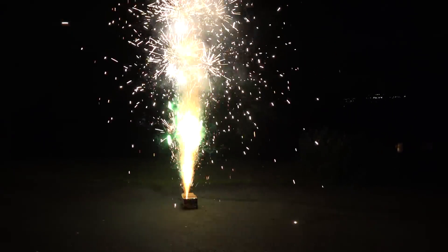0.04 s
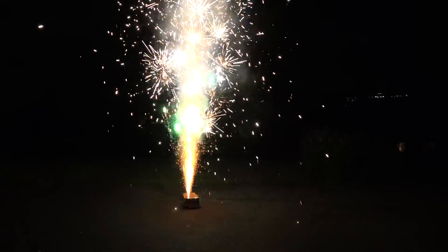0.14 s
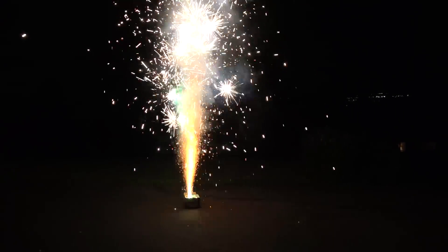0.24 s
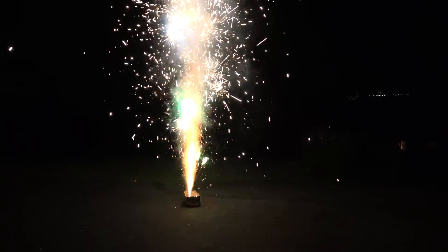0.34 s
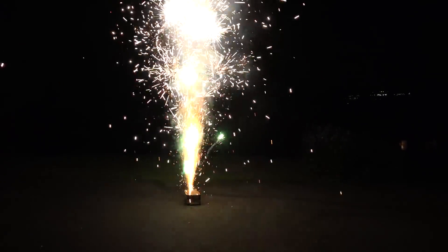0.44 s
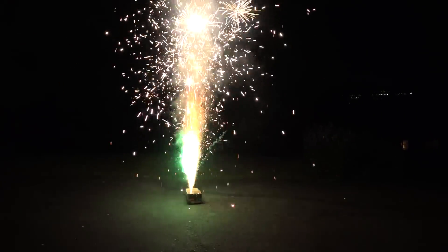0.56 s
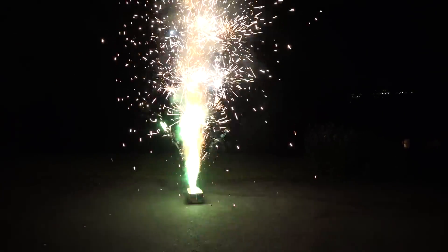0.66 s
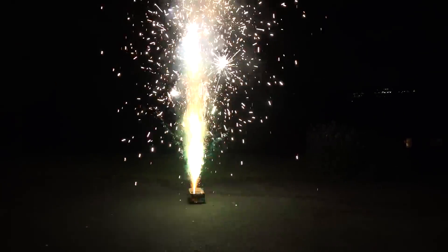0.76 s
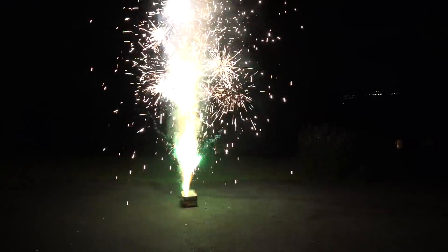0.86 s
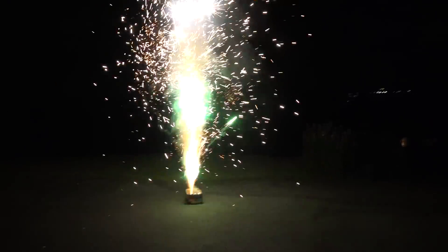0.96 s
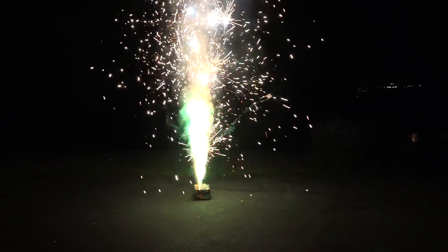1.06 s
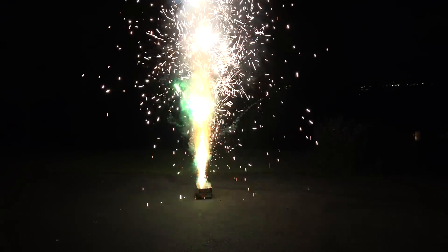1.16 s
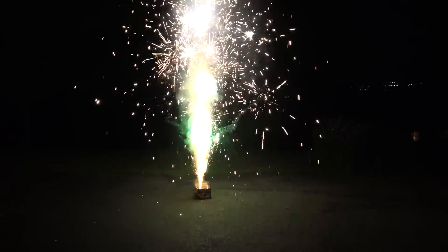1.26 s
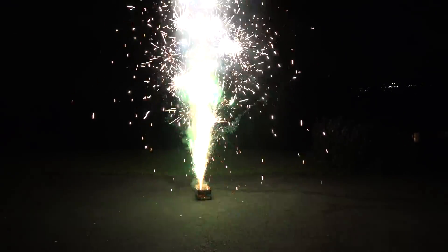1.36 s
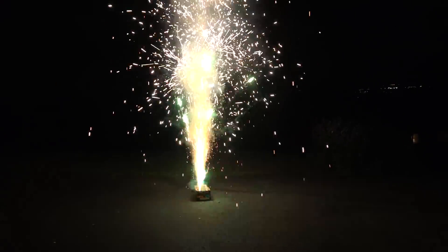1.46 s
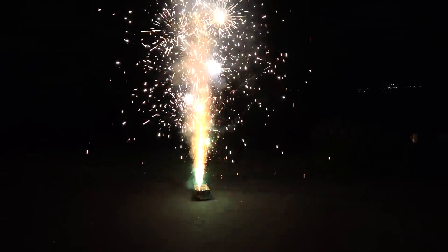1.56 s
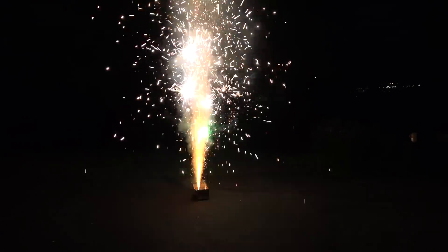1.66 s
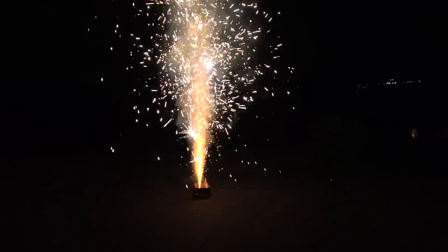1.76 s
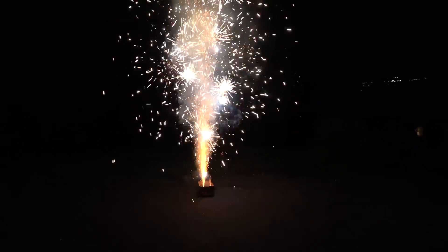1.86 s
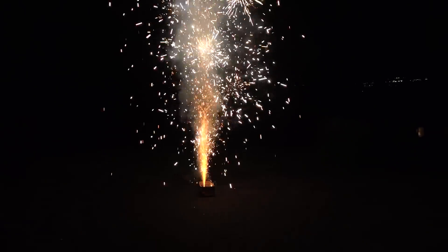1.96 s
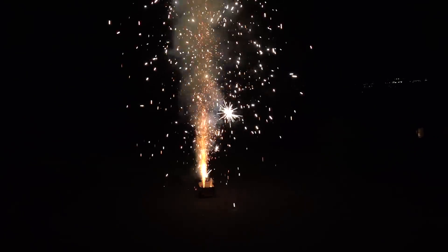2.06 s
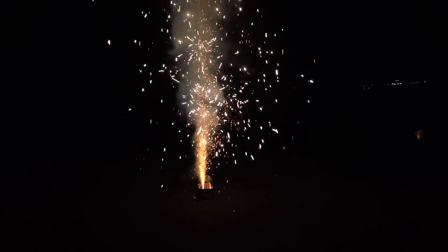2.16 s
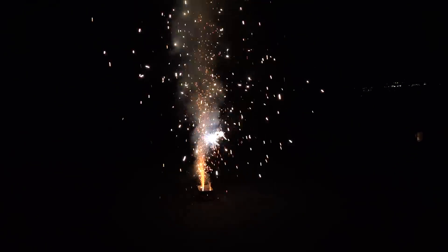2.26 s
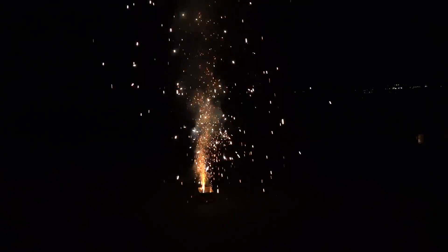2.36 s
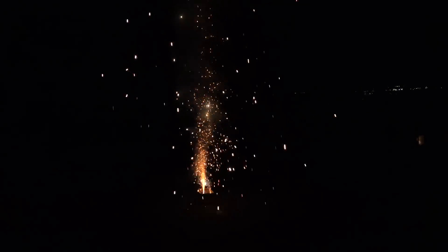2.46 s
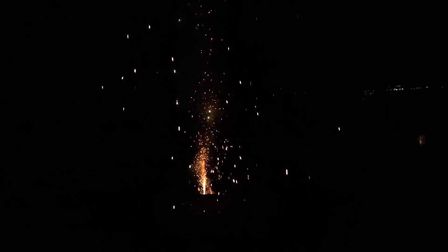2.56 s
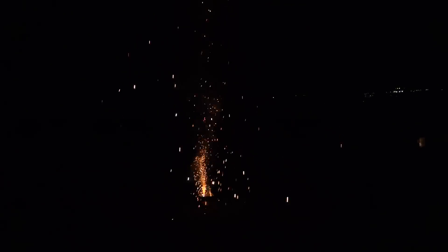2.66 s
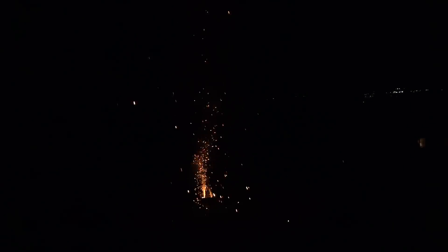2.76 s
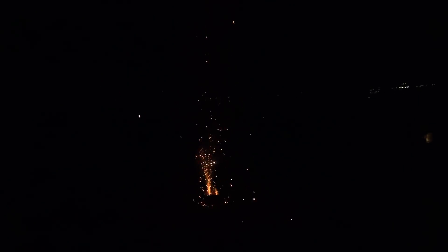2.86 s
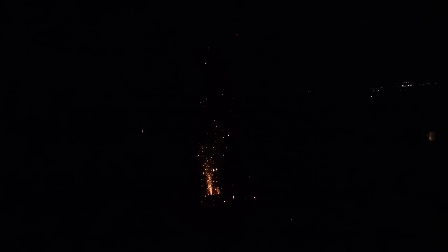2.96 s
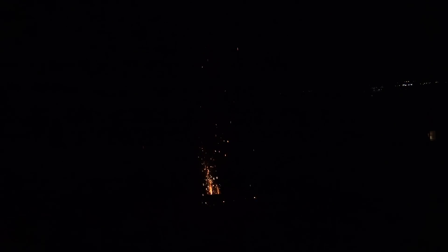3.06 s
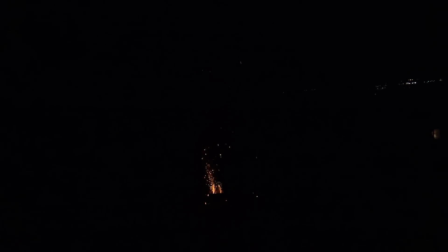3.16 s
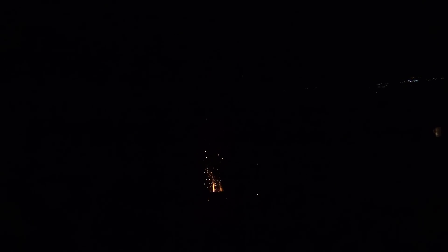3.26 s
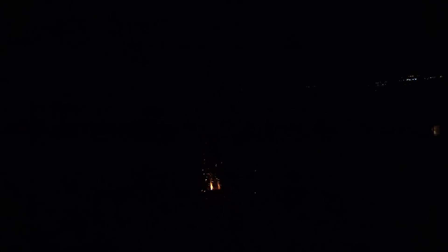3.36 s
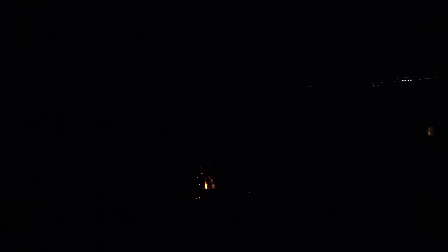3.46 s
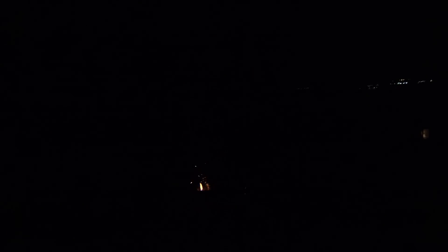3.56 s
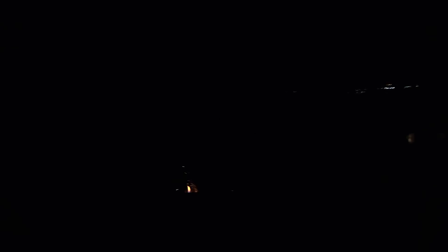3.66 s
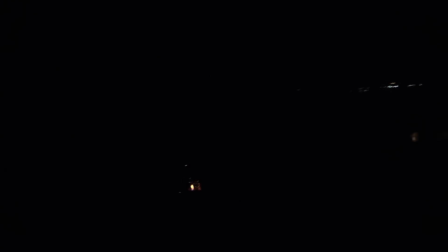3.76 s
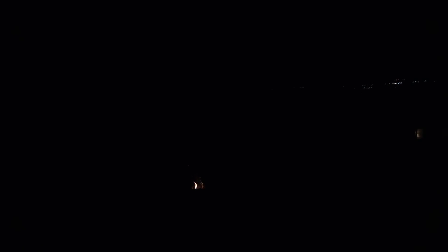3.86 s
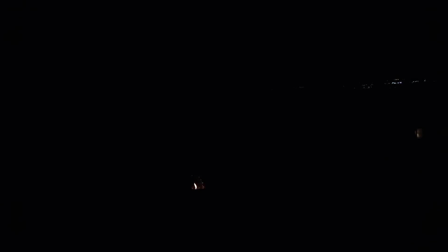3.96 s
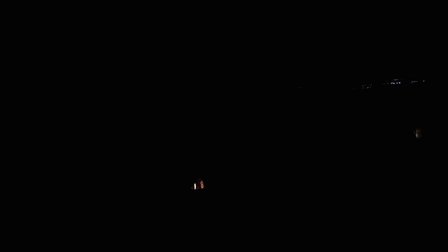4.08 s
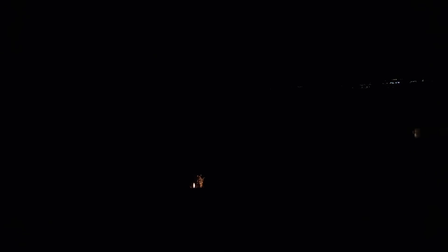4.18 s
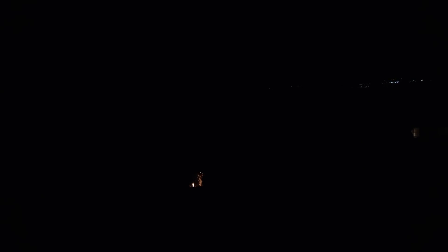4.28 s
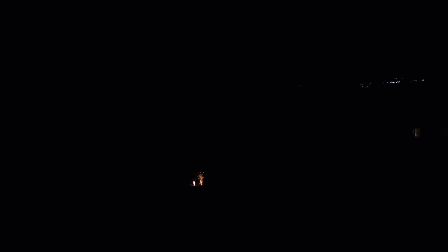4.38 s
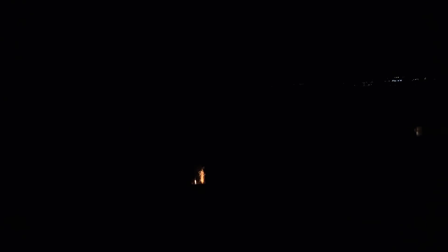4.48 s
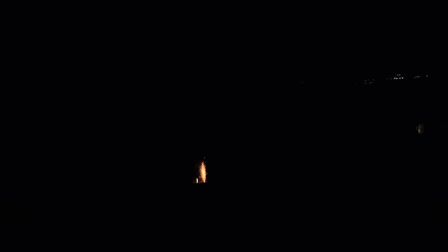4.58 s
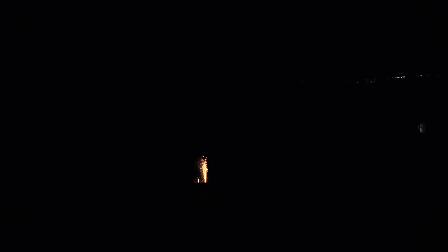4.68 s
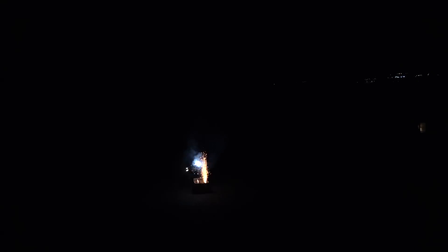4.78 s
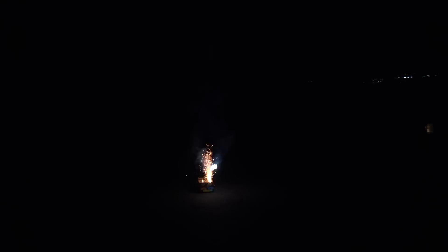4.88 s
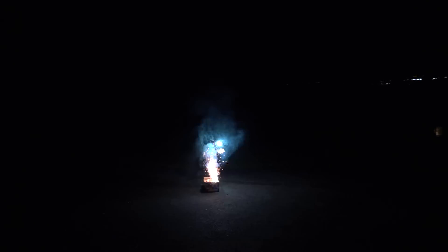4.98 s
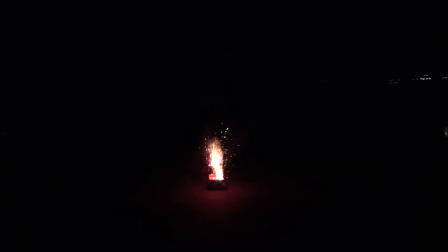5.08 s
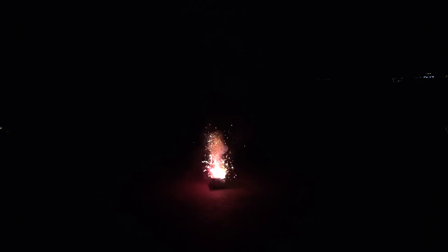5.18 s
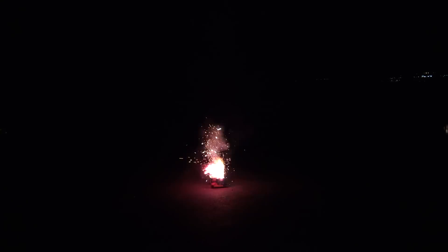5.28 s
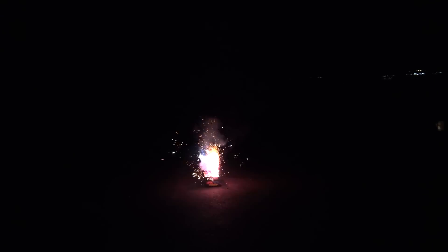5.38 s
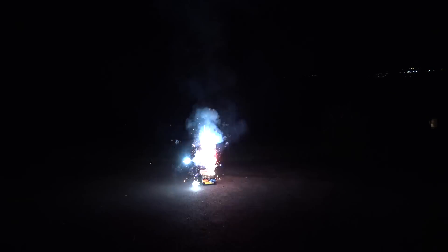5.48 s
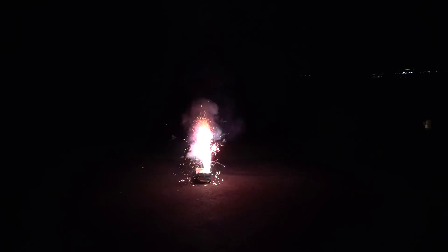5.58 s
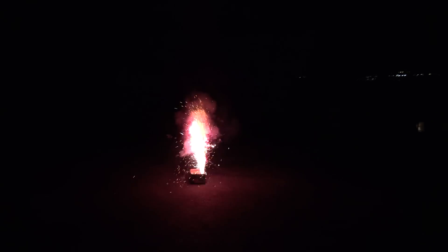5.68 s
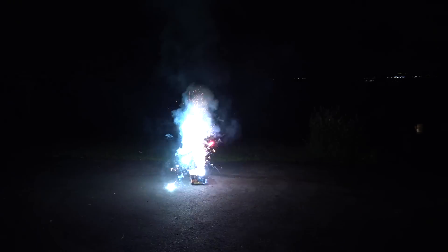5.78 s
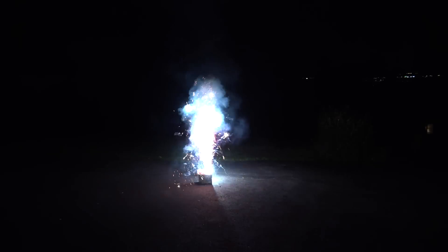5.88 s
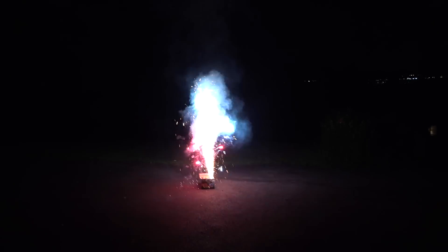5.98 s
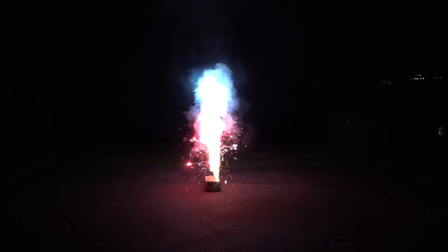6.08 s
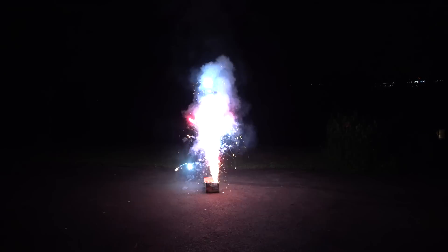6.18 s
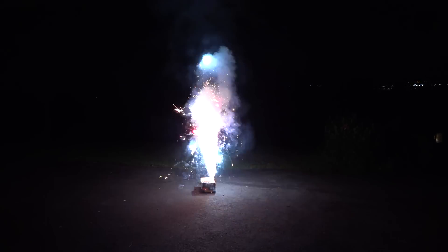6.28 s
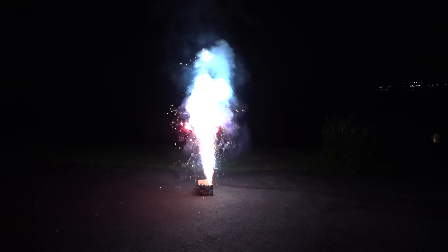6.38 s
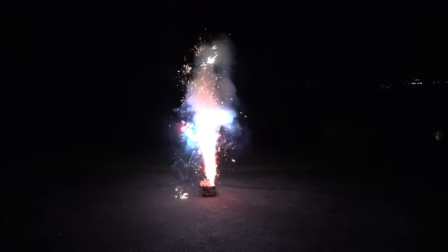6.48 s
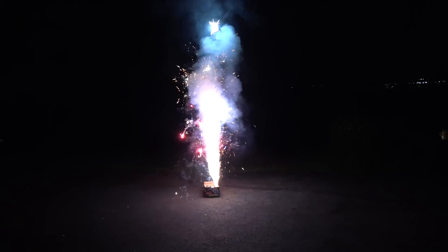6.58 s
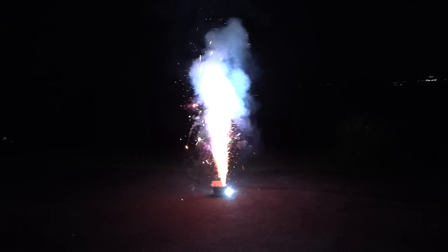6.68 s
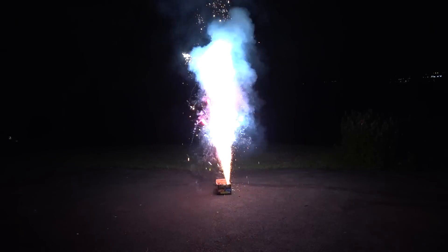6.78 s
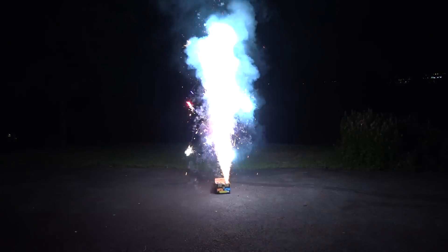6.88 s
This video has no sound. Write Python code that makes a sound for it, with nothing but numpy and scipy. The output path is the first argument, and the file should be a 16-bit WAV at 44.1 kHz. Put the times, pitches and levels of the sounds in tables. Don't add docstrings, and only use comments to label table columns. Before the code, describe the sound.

Dense, loud firework crackle snaps for two seconds, drops to a faint gassy hiss, then a new fountain sputters up into a rough roar.

```python
import sys
import numpy as np
from scipy import signal
from scipy.fft import rfft, irfft
from scipy.io import wavfile
from scipy.ndimage import uniform_filter1d

SR = 44100
rng = np.random.default_rng(int(sys.argv[2]) if len(sys.argv) > 2 else 0)


def digitize_waveform(pressure):
    field = np.atleast_2d(pressure).T
    bounded = np.clip(field, -1, 1)
    quanta = np.round(bounded * 32767).astype(np.int16)
    wavfile.write(sys.argv[1], SR, quanta)


def ratio_of_db(decibels):
    return 10 ** (np.asarray(decibels, float) / 20)


N = 306045

# pitch_hz, level_db
STAR_COLOUR = [(88, -43.5), (150, -15.5), (254, -6.5), (454, -10.5), (630, -6), (2010, -5), (2290, -4),
               (2840, -5.5), (5460, 0), (7040, -7), (8140, -0.5), (10700, -16), (11500, -10),
               (15000, -73.5), (22000, -120)]
# time_s, depth_db, half_width_s
LULLS = [
    (0.116, 2.5, 0.12),
    (0.48, 3.5, 0.031),
    (0.634, 4.5, 0.027),
    (0.852, 13, 0.0063),
    (0.952, 3.5, 0.024),
    (1.01, -3.5, 0.0043),
    (1.142, 3, 0.036),
    (1.655, 5, .015),
    (1.714, -1, .012),
]
# start_s, jolt_db
NEAR_SHOCKS = [(0.1815, -24), (0.2195, -21), (0.2765, -17), (0.3447, -36), (0.3784, -27), (0.4572, -36),
               (0.7039, -19), (0.7149, -19), (0.8349, -17), (0.9427, -22), (0.9844, -36), (1.1327, -15),
               (1.1537, -17), (1.1673, -31), (1.2037, -21), (1.3087, -31), (1.4464, -24), (1.4614, -18),
               (1.5028, -25), (1.5348, -24), (1.6386, -23), (1.688, -32), (1.7639, -18), (1.8137, -36)]
# start_s, peak_db,
# shocks, spacing_ms
LAST_STARS = [(1.8835, -12, 4, 1.3), (1.9032, -18, 2, .7), (1.9693, -18, 3, 1.0), (1.975, -11, 2, 2.0),
              (1.9941, -12, 2, 2.8), (2.0014, -11, 4, 2.5), (2.0261, -10, 4, 1.2), (2.0346, -11, 2, 3.2),
              (2.0751, -22, 1, 1.0), (2.1676, -24, 2, 1.6), (2.1743, -16, 6, 1.1), (6.32, -13, 2, 2.1),
              (6.448, -8, 2, 2.6), (6.4562, -13, 2, 1.5), (6.4871, -9, 2, 3.9), (6.7113, -9.5, 1, 1.0),
              (6.7563, -11, 1, 1.0), (6.8558, -10.5, 1, 1.0)]
# pitch_hz, level_db
RUMBLE_COLOUR = [(18, -34), (30, -30), (54, -16), (113, -4), (214, -6), (253, -18.5), (368, -21.5),
                 (420, -46), (550, -71.5), (920, -120)]
# pitch_hz, level_db
ROAR_COLOUR = [(120, -18), (200, 2.5), (283, 1.5), (454, -3), (755, -2.5), (1190, -7), (1900, -11.5),
               (2470, -43), (4180, -120)]
# pitch_hz, level_db
HISS_COLOUR = [(900, -35.5), (1700, -12.5), (2400, 0.5), (3300, -2.5), (5000, -6.5), (6700, -13.5),
               (7600, -16), (9000, -15), (9700, -28), (11500, -24)]
# pitch_hz, level_db
FAINT_HISS_COLOUR = [(900, -41.5), (1700, -26), (2000, -16.5), (2500, -7), (4000, -7.5), (5200, -11),
                     (6700, -21.5), (7600, -20), (8600, -23.5), (9000, -24.5), (9600, -28.5),
                     (11500, -26.5)]
# pitch_hz, width_hz, lift_db
TUBE_RINGING = [(113, 17, 3.6), (164, 19, 3.7)]
# pitch_hz, width_hz, lift_db
MOUTH_RINGING = [(3646, 520, 4.5), (4580, 470, 3), (7870, 570, 7.5), (8230, 130, 3)]
# pitch_hz, width_hz, lift_db
WEAK_FLAME_RINGING = [(3560, 260, 3.0), (4640, 200, 3.5)]
# time_s, burn_db
BURN = [(2.3, -57.5), (2.55, -59), (3.05, -56), (3.4, -58), (3.8, -56), (4.1, -58), (4.4, -57), (4.62, -50),
        (4.9, -43.5), (5.08, -47.5), (5.34, -40.5), (5.52, -37), (5.62, -40.5), (5.7, -35.5), (5.93, -34.5),
        (6.03, -34), (6.45, -31), (6.94, -26)]
# pitch_hz, level_db
ECHO_COLOUR = [(200, -11), (1500, -9.5), (3000, -14), (5000, -4), (8000, -8), (11000, -10.5)]
# pitch_hz, fade_s
ECHO_FADE = [(200, 0.23), (1000, 1), (4500, 1), (10000, 1)]
# start_s, tick_db, knock_db, puff_db
SPITS = [(2.3844, -28, -23, -5), (2.392, -37, -25, 0), (2.4897, -39, -11, -6), (2.796, -33, -14, -11),
         (4.6329, -31, -0.5, -13), (4.6782, -25.5, -25, -14), (4.6954, -27.5, -5, -2),
         (4.7943, -21.5, -5.5, -7), (4.8988, -21.5, -3, 0), (4.9215, -18, -20, -24),
         (4.9663, -22, -1.5, -2.5), (5.0645, -19.5, -4, -7.5), (5.1526, -20, -8, -0.5),
         (5.2326, -24, -0.5, -3), (5.2841, -19, -13, -9), (5.3778, -25, 3, 4.5), (5.393, -25, -2, 4),
         (5.4745, -28, 4, 7.5), (5.5062, -17, -13, -3), (5.5728, -26.5, 2, 4), (5.6864, -22, -6, 4.5),
         (5.92, -16.5, 4, 5), (5.9475, -15.5, -0.5, 2.5), (6.106, -14.5, -5.5, -14),
         (6.2485, -15.5, -16, -1), (6.321, -15.5, -1, 1), (6.448, -20, -6, -3), (6.124, -16, 1, 1),
         (6.3512, -23, 7, 1), (5.7118, -24, 3, 5.5)]
# pitch_hz, level_db
TICK_COLOUR = [(2000, -38), (3200, -5.5), (4600, -1.5), (6500, -11), (8000, -12), (11000, -25)]
# pitch_hz, level_db
KNOCK_COLOUR = [(600, -27), (1200, -1), (2200, -2), (3200, -8.5), (5500, -27.5)]
# pitch_hz, level_db
PUFF_COLOUR = [(80, -36), (250, 0.5), (500, -6), (780, -0.5), (1100, -4.5), (1700, -14.5), (4000, -49.5)]
# pitch_hz, width_hz, lift_db
HOLLOW_RINGING = [(760, 280, 3)]
# pitch_hz, level_db
PORT_DIFFERENCE = [(60, -16.5), (220, -18), (820, -10), (1600, -28.5), (3000, -20.5), (4600, -18.5),
                   (5900, -5), (7000, -0.5), (11300, 3.5)]
# pitch_hz, level_db
LEFT_TREBLE = [(3000, -54), (5800, -68.5), (7000, -24), (8100, -12), (11000, -17.5)]
# pitch_hz, level_db
SELF_NOISE_COLOUR = [(60, 9), (700, -7), (2000, -15.5), (5000, -21.5), (8000, -15.5), (11000, -20)]

SHOWER_END_S, SHOWER_FADE_DB_PER_S = 1.885, 1.5
CRACKS_PER_S, CRACK_DB, CRACK_SPREAD_DB = 140., -11.3, 1.5
BOUNCE_MS, BOUNCE_DB, BOUNCE_JOLT_DB = 3.6, -4.0, -31
BOUNCE_SPREAD_MS = 1.6
STRING_FADE_DB = 1.3
DULL_HZ, DEBRIS_DB, DEBRIS_MS = 3550, -23, 0.91

OLD_DB, OLD_SAG_DB_PER_S = np.array([[-53], [-45], [-33.5]]), np.array([[1.5], [6], [3.6]])
OLD_OUT_S, OLD_DIES_DB_PER_S = 2.056, 81.5
# level at a burn of -45 dB, and dB gained for each dB of burn
NEW_DB, NEW_SLOPE = np.array([[-43], [-47], [-44.5]]), np.array([[0.36], [1.055], [0.97]])
WARM_DB, WARM_S = 9.5, .5
FLARE_S, SPUTTER_PER_S, SPUTTER_DB = 4.6, 85, 8


def evened(x):
    return x / np.sqrt(np.mean(x ** 2) + 1e-20)


def read(points, hz):
    f, value = np.transpose(points)
    return np.interp(np.log(hz + 1), np.log(f + 1), value)


def causal(points, modes=()):
    hz = abs(np.fft.fftfreq(8192, 1 / SR))
    db = read(points, hz)
    for f, width, lift_db in modes:
        db = db + lift_db / (1 + (2 * (hz - f) / width) ** 2)
    gain = np.log(ratio_of_db(np.maximum(db, -100)))
    spectrum = np.exp(gain - 1j * signal.hilbert(gain).imag)
    return np.fft.ifft(spectrum).real[:3000]


def coloured(x, points, modes=()):
    return signal.oaconvolve(x, causal(points, modes))[:N]


def shock(points, modes=()):
    pulse = causal(points, modes)
    return -pulse / pulse.max()


def train(times, sizes):
    out = np.zeros(N)
    places = np.round(np.asarray(times) * SR).astype(int) - 2
    np.add.at(out, np.clip(places, 0, N - 1), sizes)
    return out


def around(x, rise_ms, fall_ms):
    rise, fall = np.exp(-1e3 / (rise_ms * SR)), np.exp(-1e3 / (fall_ms * SR))
    after = signal.lfilter([1], [1, -fall], x)
    before = signal.lfilter([0, rise], [1, -rise], x[::-1])[::-1]
    return after + before


def ground(x, ms, db):
    return x + ratio_of_db(db) * np.roll(x, round(ms * SR / 1e3))


def clumps(per_s, ms, dense, spread_db):
    starts = (rng.random(N) < per_s / SR) * rng.exponential(1, N)
    swarm = signal.lfilter([1], [1, -np.exp(-1e3 / (ms * SR))], starts)
    fires = rng.random(N) < dense * (swarm + .4) / SR
    return fires * ratio_of_db(spread_db * np.minimum(rng.exponential(1, N), 2.6))


def cracks(busy):
    step, chance, height, size = rng.random((round(CRACKS_PER_S * SHOWER_END_S), 4)).T
    s = np.cumsum(.3 + 1.4 * step) / CRACKS_PER_S
    happens = chance < busy[(s * SR).astype(int)] ** 2
    peak = ratio_of_db(CRACK_SPREAD_DB * 3.4 * (size - .5)) * happens
    late_s = (BOUNCE_MS + BOUNCE_SPREAD_MS * (height - .7)) / 1e3
    return train(s, peak) + train(s + late_s, peak * ratio_of_db(BOUNCE_DB * 2 * height))


def stars():
    t = np.arange(N) / SR
    lull_db = sum(db * np.exp(-((t - s) / width) ** 2) for s, db, width in LULLS)
    fade_db = SHOWER_FADE_DB_PER_S * np.maximum(t - SHOWER_END_S + 1, 0)
    busy = ratio_of_db(-lull_db - fade_db) * (t < SHOWER_END_S)

    small = ground(clumps(110., ms=9., dense=1100., spread_db=4.5), ms=2.8, db=-16.0)
    power = uniform_filter1d(small ** 2, size=2600) * np.sum(shock(STAR_COLOUR) ** 2)
    small *= ratio_of_db(-33.0) * busy / np.sqrt(power + 1e-9)

    near = ground(train(np.transpose(NEAR_SHOCKS)[0], 1.), BOUNCE_MS, BOUNCE_DB)
    big = ratio_of_db(CRACK_DB) * (cracks(busy) + ratio_of_db(-0.5) * near)
    for s, db, count, ms in LAST_STARS:
        k = np.arange(count)
        late, weak = rng.random((8, 2))[:count].T
        follows = k > 0
        times = s + (k + .5 * (late - .5) * follows) * ms / 1e3
        big += train(times, ratio_of_db(db - (STRING_FADE_DB * k + 1.2 * weak) * follows))

    debris = ratio_of_db(DEBRIS_DB) * rng.standard_normal(N) * around(big, DEBRIS_MS, DEBRIS_MS)
    shocks = small + big
    dull = 0.18 * rng.random(N)
    keep = np.exp(-2 * np.pi * DULL_HZ / SR)
    dulled = signal.lfilter([1 - keep], [1, -keep], dull * shocks)
    shocks = (1 - dull) * shocks + 3.55 * dulled + debris
    aside = shocks * rng.standard_normal(N)
    return [signal.oaconvolve(x, shock(STAR_COLOUR))[:N] for x in (shocks, aside)]


def registers():
    t = np.arange(N) / SR
    since_out_s = np.maximum(t - OLD_OUT_S, 0)
    old = OLD_DB - OLD_SAG_DB_PER_S * t - OLD_DIES_DB_PER_S * since_out_s
    new = NEW_DB + NEW_SLOPE * (np.interp(t, *np.transpose(BURN)) + 45)
    new[0] -= WARM_DB * np.exp(-since_out_s / WARM_S)
    return 10 * np.log10(ratio_of_db(2 * old) + ratio_of_db(2 * new))


def flicker(hz):
    size = int(SR / hz)
    return evened(uniform_filter1d(uniform_filter1d(rng.standard_normal(N), size), size))


def patchy(x, db):
    z = signal.stft(x, nperseg=512)[2]
    patches = uniform_filter1d(rng.standard_normal(z.shape), size=6, axis=0)
    patches = uniform_filter1d(patches, size=24, axis=1)
    return signal.istft(z * ratio_of_db(db * evened(patches)), nperseg=512)[1][:N]


def jet():
    rumble_db, roar_db, hiss_db = registers()
    gust, flutter = flicker(15.), flicker(100.)
    grains = evened(ground(clumps(40., ms=6., dense=2000.0, spread_db=-0.5), ms=.9, db=-8.0))
    strong = np.clip((roar_db + 62) / 18, 0, 1)
    noise = rng.standard_normal((3, N))

    rumble = evened(coloured(noise[0], RUMBLE_COLOUR, TUBE_RINGING))
    rumble *= ratio_of_db(rumble_db + 0.5 * gust + 0.34 * flutter)

    roar = evened(coloured(noise[1] - 0.26 * strong * grains, ROAR_COLOUR))
    roar *= ratio_of_db(roar_db + strong * (0.1 * gust + 2.1 * flutter))

    gas = noise[2] - 0.27 * strong * grains
    full = evened(coloured(gas, HISS_COLOUR, MOUTH_RINGING))
    faint = evened(coloured(gas, FAINT_HISS_COLOUR, MOUTH_RINGING + WEAK_FLAME_RINGING))
    hiss = strong * full + (1 - strong) * patchy(faint, db=1.6)
    hiss *= ratio_of_db(hiss_db - 0.5 + strong * (.6 * gust + 1.0 * flutter))
    return rumble, roar + hiss


def yard(x, wall_ms=50.7, wall_db=11.5):
    taps = np.zeros((2, SR // 2))
    at = np.arange(300, SR // 2 - 20, 20)
    at = at + rng.integers(0, 20, (2, len(at)))
    wall = 1 + ratio_of_db(wall_db) * np.exp(-((at / SR * 1e3 - wall_ms) / 18.0) ** 2)
    np.put_along_axis(taps, at, wall * rng.choice([-1., 1.], at.shape), 1)
    hz, t, z = signal.stft(taps, SR, nperseg=256)
    fade_db = np.log10(1e60) * t / read(ECHO_FADE, hz)[:, None]
    fading = ratio_of_db(read(ECHO_COLOUR, hz)[:, None] - fade_db)
    tail = signal.istft(z * fading, SR, nperseg=256)[1]
    return signal.fftconvolve(x[None], tail / np.linalg.norm(tail[0]), axes=1)[:, :N]


def jolts():
    s, db = np.transpose(NEAR_SHOCKS)
    u = np.arange(SR // 50) / SR / 0.00068
    step = (1 - np.exp(-u / 0.11)) * (1.52 * np.exp(-u) - 0.37 * np.exp(-u / 12.0))
    pushes = train(s, ratio_of_db(db)), train(s + BOUNCE_MS / 1e3, ratio_of_db(BOUNCE_JOLT_DB - 6))
    hit = np.array([signal.oaconvolve(x, step)[:N] for x in pushes])
    low_cut = signal.butter(2, 42, btype="high", fs=SR)
    return signal.lfilter(*low_cut, hit - 0.46 * hit[::-1])


def sputter():
    left_s = N / SR - FLARE_S
    s, size, knock, puff = rng.random((round(SPUTTER_PER_S * left_s), 4)).T
    s = FLARE_S + s * left_s
    tick_db = np.interp(s, *np.transpose(BURN)) + SPUTTER_DB + 6.0 * (size - .5)
    return np.c_[s, tick_db, -4.0 + 14. * (knock - .5), -4.5 + 12. * (puff - .5)]


def spits():
    s, db, knock_db, puff_db = np.r_[SPITS, sputter()].T
    ticks = signal.oaconvolve(train(s, ratio_of_db(db - 5.0)), shock(TICK_COLOUR, MOUTH_RINGING))
    knocks = signal.oaconvolve(train(s, ratio_of_db(db + knock_db + 1.2)), shock(KNOCK_COLOUR))
    puffs = signal.oaconvolve(train(s, ratio_of_db(db + puff_db - 1.5)), shock(PUFF_COLOUR, HOLLOW_RINGING))
    snaps = signal.oaconvolve(train(s, ratio_of_db(db - 19)), shock(STAR_COLOUR))

    noise = rng.standard_normal((2, N))
    high_rush = evened(coloured(noise[0], TICK_COLOUR, MOUTH_RINGING))
    high_rush *= around(train(s, ratio_of_db(db - 17.5)), rise_ms=1.33, fall_ms=11.1)
    low_rush = evened(coloured(noise[1], ROAR_COLOUR))
    low_rush *= around(train(s, ratio_of_db(db + puff_db - 16.0)), rise_ms=3.5, fall_ms=9.2)
    return (ticks + knocks + puffs + snaps)[:N] + high_rush + low_rush


def scene():
    high, aside = stars()
    rumble, flame = jet()
    low = flame + spits()
    wet = ratio_of_db(-6.5) * yard(high) + ratio_of_db(-7.5) * yard(low)
    both = high + low + wet.mean(0)

    z = signal.stft(ratio_of_db(-17.5) * high + ratio_of_db(-6.0) * (low + rumble), nperseg=256)[2]
    scattered = signal.istft(z * np.exp(2j * np.pi * rng.random(z.shape)), nperseg=256)[1][:N]
    lean = irfft(rfft(both) * ratio_of_db(read(LEFT_TREBLE, np.fft.rfftfreq(N, 1 / SR))), N)
    sides = scattered + ratio_of_db(-8) * aside + ratio_of_db(-11) * (wet[0] - wet[1])
    difference = coloured(sides, PORT_DIFFERENCE) + lean
    rumbles = rumble * ratio_of_db(np.array([[-.9], [.9]]))
    return both + np.array([[1], [-1]]) * difference + rumbles + jolts()


def masked(x, under_db, whim_db, from_hz=5200., quiet_db=-96.0):
    hz, t, z = signal.stft(x, SR, nperseg=1024)
    bands = uniform_filter1d(abs(z) ** 2, size=7, axis=0)[3::7]
    bands = uniform_filter1d(bands, size=3, axis=1)
    chance = evened(uniform_filter1d(rng.standard_normal(bands.shape), size=3, axis=1))
    whim = ratio_of_db(2 * whim_db * chance)
    middle = (hz > 2500) & (hz < 5000)
    hiss = uniform_filter1d(abs(z[middle] ** 2).mean(0), size=9)
    weak = bands * whim < hiss / ratio_of_db(2 * under_db) + ratio_of_db(2 * quiet_db)
    weak = weak.repeat(7, axis=0)
    treble = hz[:len(weak), None] > from_hz
    z[:len(weak)] *= np.where(weak & treble, .08, 1)
    return signal.istft(z, SR, nperseg=1024)[1][:N]


def roll_off(x):
    return signal.sosfilt(signal.butter(12, 11900, fs=SR, output="sos"), x)


def record(dry):
    noise = [evened(coloured(x, SELF_NOISE_COLOUR)) for x in rng.standard_normal((2, N))]
    ports = dry + ratio_of_db(-62.5) * np.array(noise)
    middle = ports.mean(0)
    ports += masked(middle, under_db=23., whim_db=5.) - middle
    edge = signal.firwin(901, 10990, window=("kaiser", 6), fs=SR)
    band = signal.oaconvolve(ports, edge[None], "same")
    knee, room = .36, .16
    straight = np.clip(band, -knee, knee)
    limited = straight + room * np.tanh((band - straight) / room)
    return roll_off(limited)


dry = scene()
out = record(dry)
digitize_waveform(out)
```